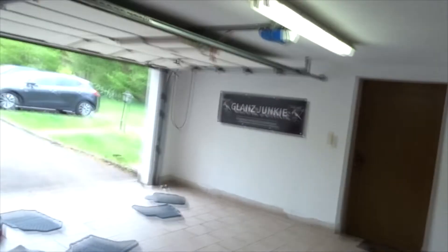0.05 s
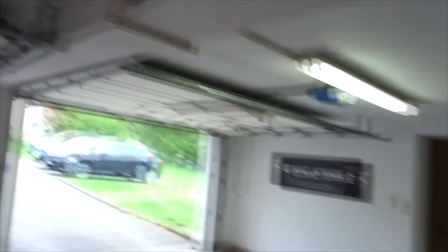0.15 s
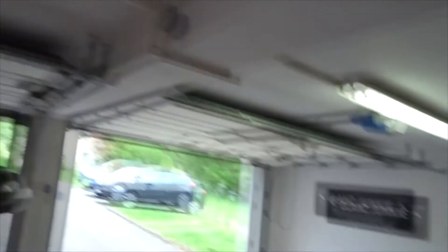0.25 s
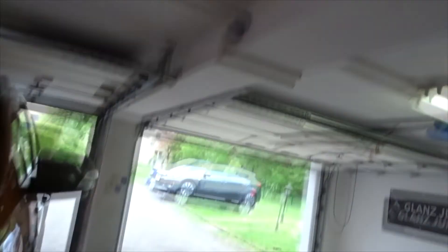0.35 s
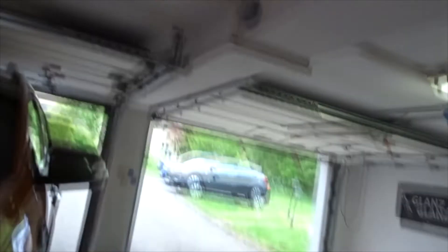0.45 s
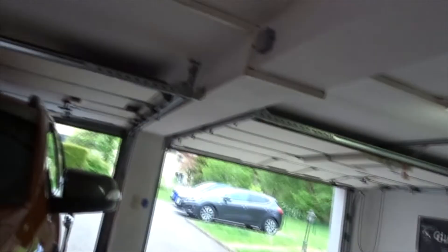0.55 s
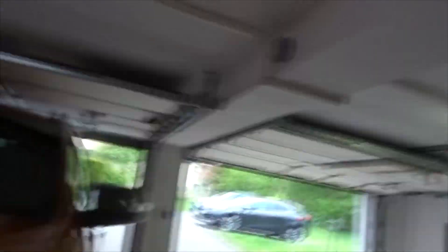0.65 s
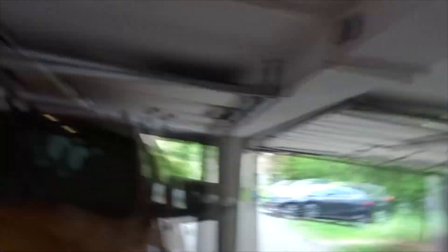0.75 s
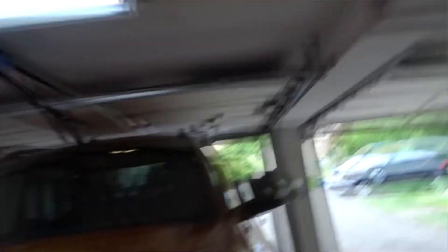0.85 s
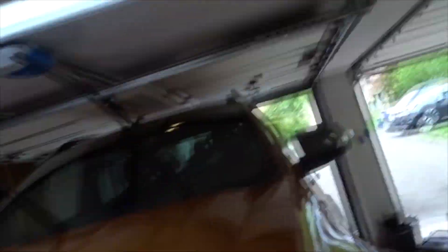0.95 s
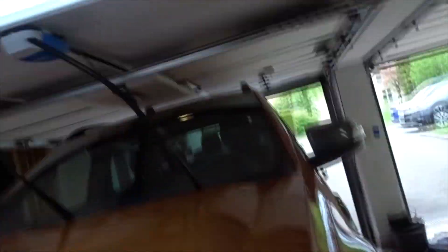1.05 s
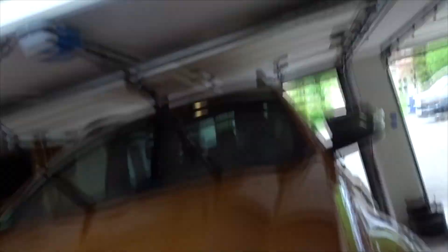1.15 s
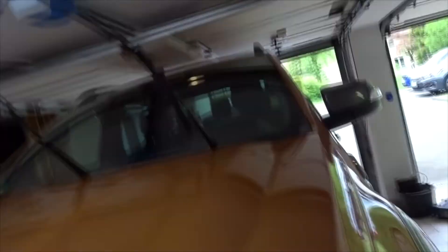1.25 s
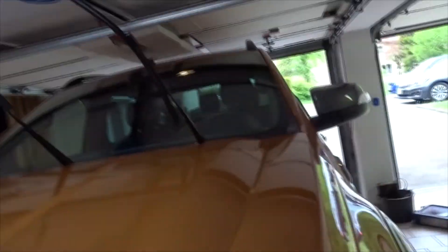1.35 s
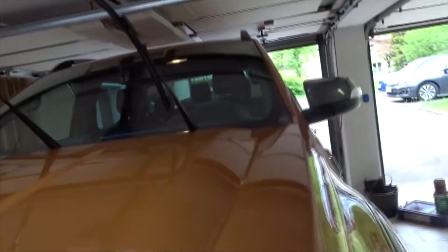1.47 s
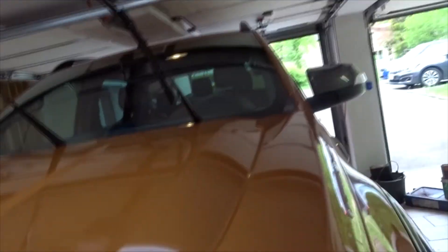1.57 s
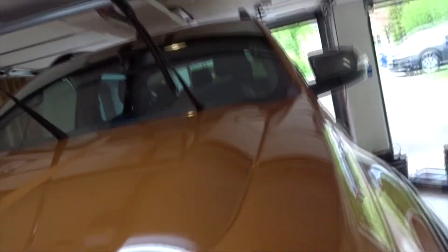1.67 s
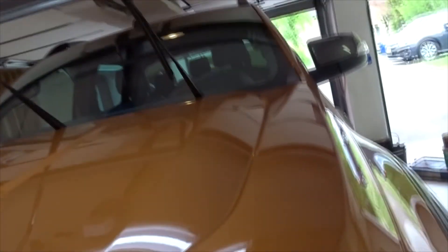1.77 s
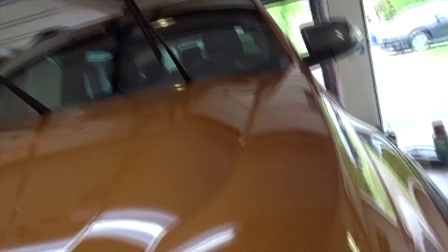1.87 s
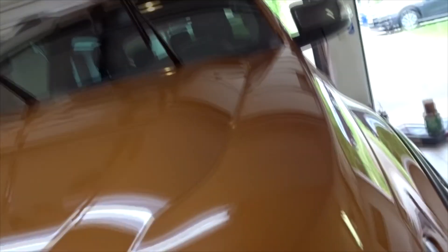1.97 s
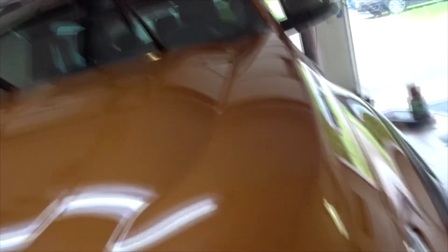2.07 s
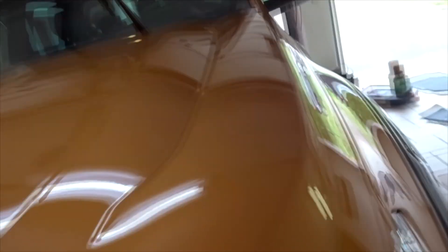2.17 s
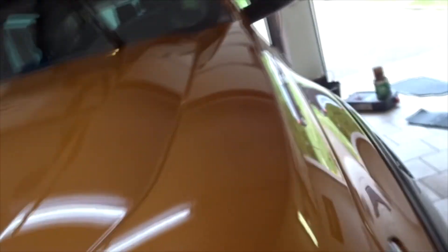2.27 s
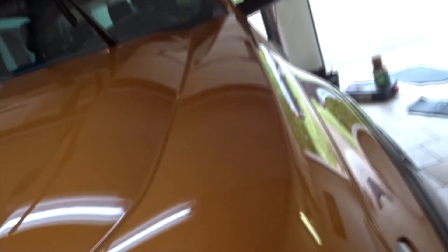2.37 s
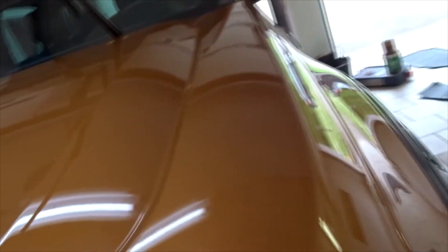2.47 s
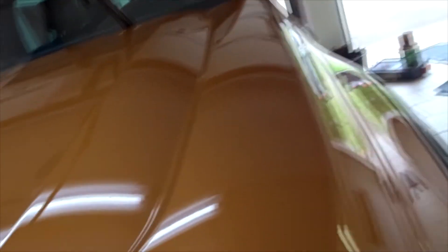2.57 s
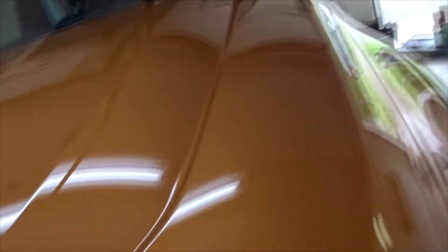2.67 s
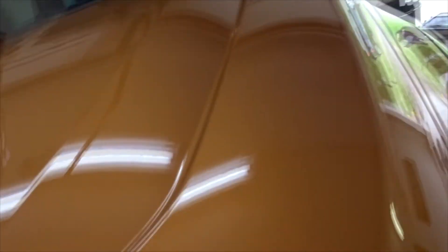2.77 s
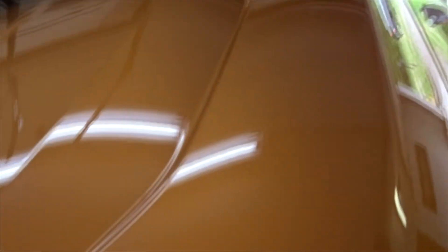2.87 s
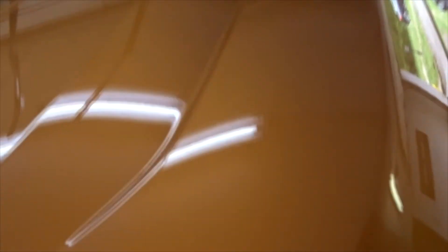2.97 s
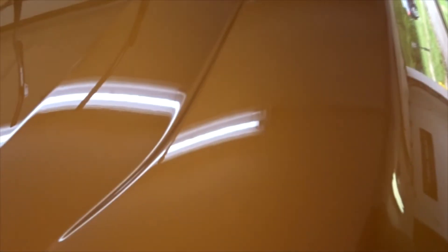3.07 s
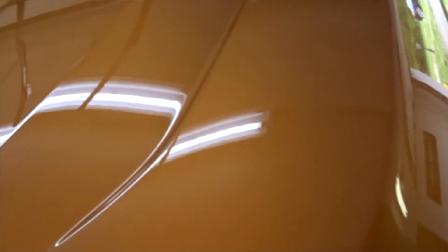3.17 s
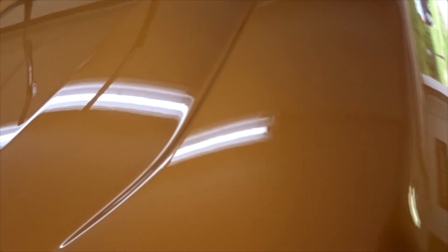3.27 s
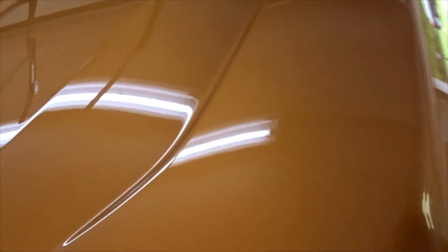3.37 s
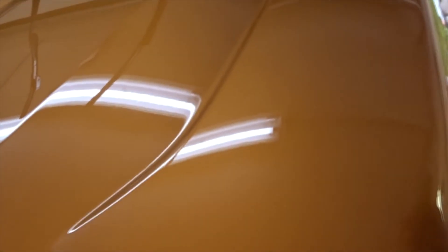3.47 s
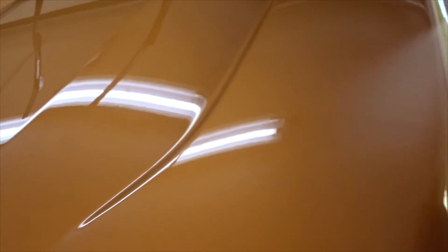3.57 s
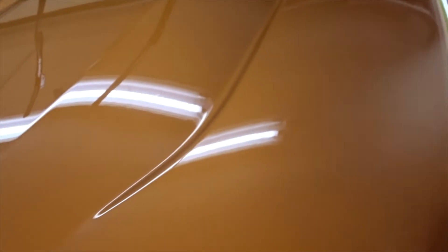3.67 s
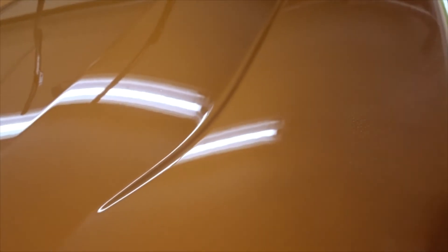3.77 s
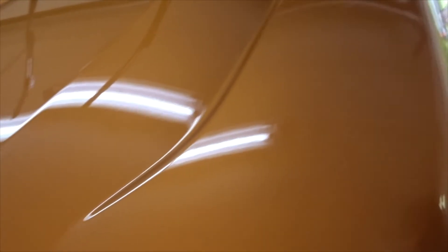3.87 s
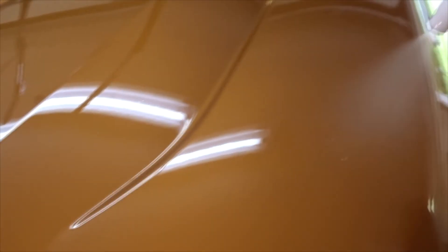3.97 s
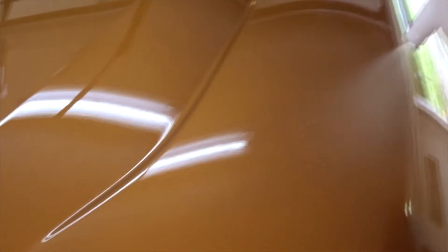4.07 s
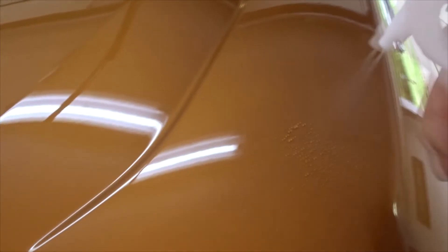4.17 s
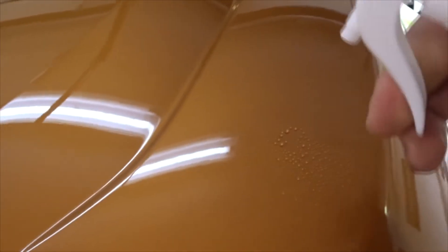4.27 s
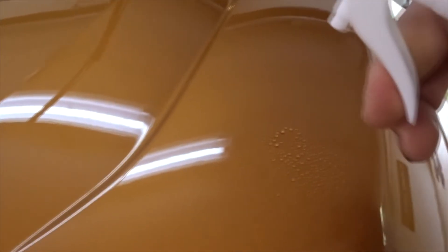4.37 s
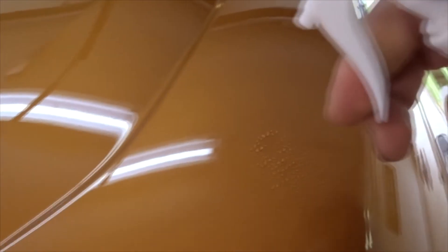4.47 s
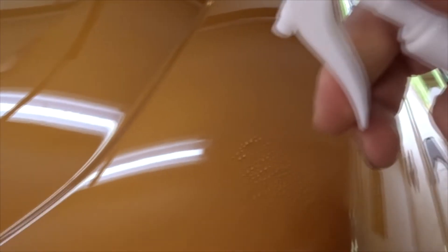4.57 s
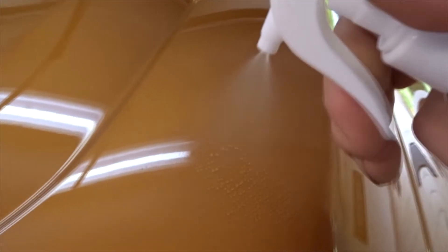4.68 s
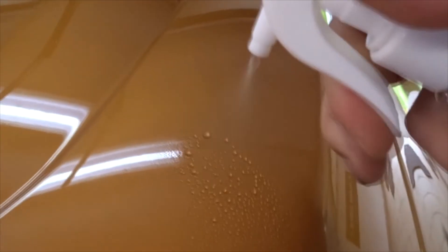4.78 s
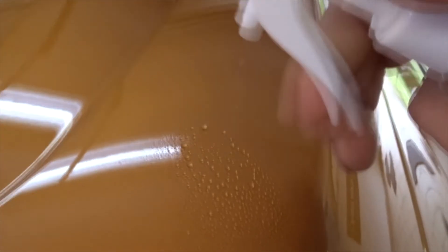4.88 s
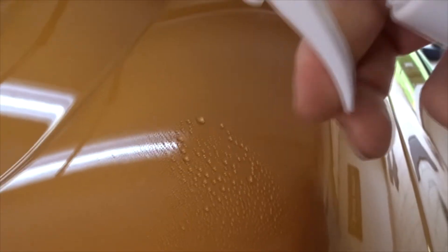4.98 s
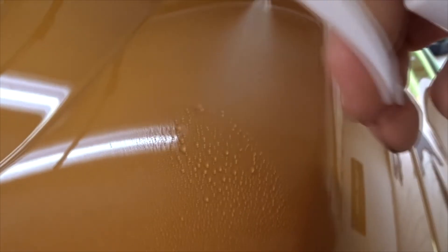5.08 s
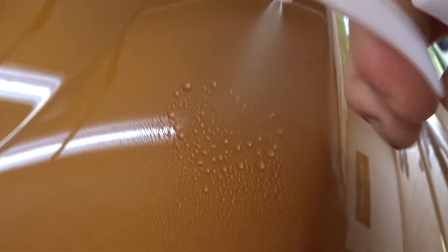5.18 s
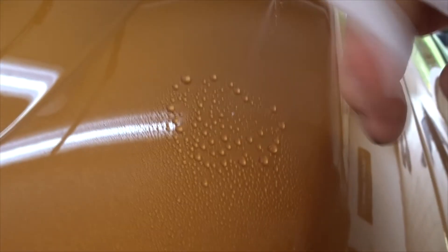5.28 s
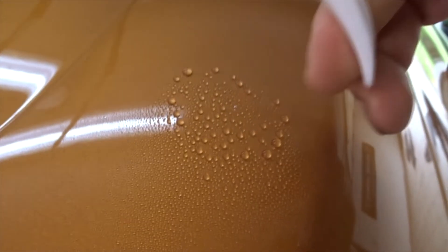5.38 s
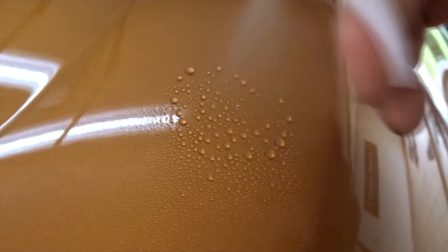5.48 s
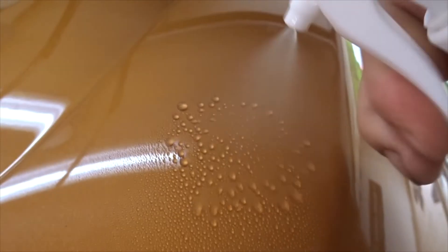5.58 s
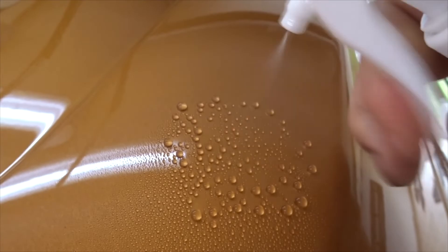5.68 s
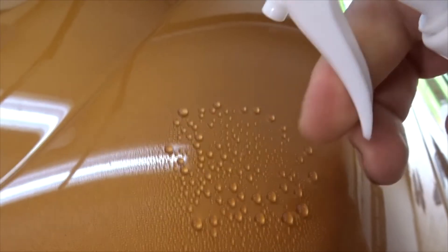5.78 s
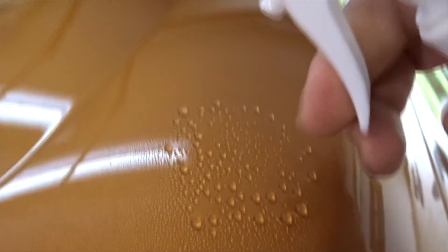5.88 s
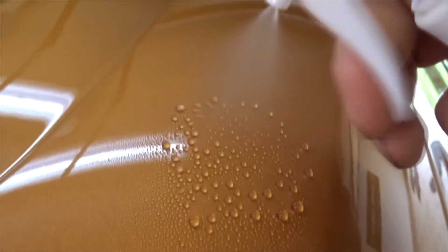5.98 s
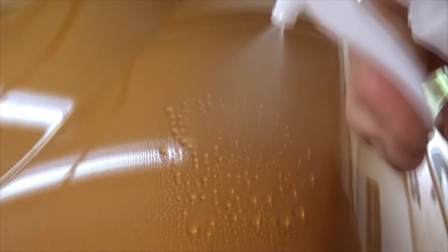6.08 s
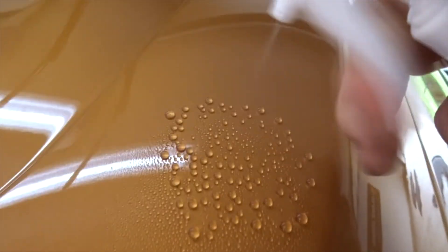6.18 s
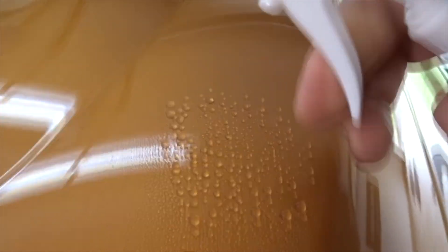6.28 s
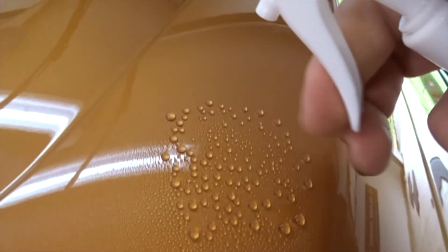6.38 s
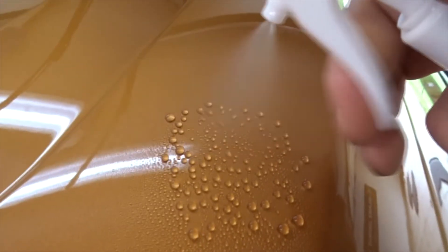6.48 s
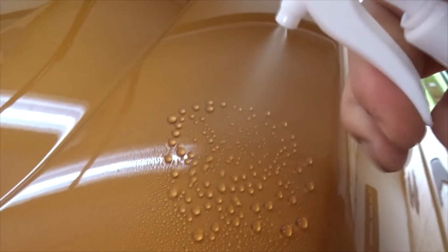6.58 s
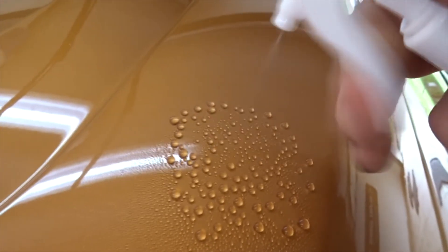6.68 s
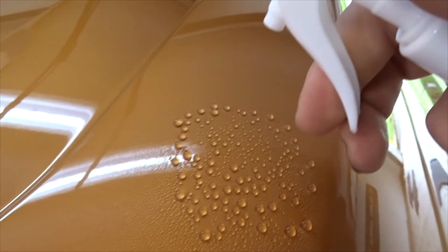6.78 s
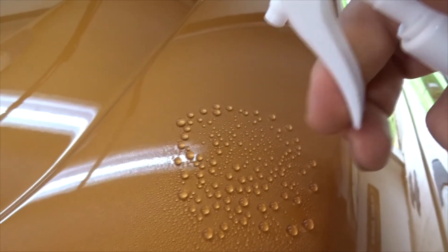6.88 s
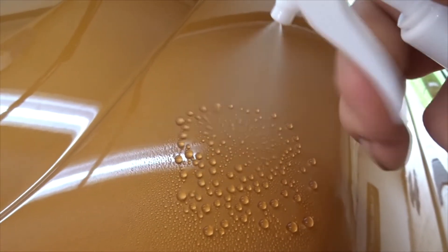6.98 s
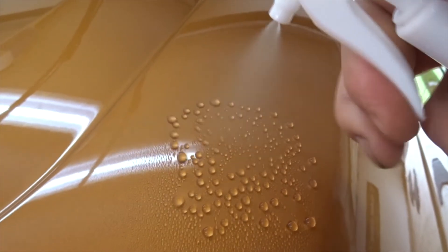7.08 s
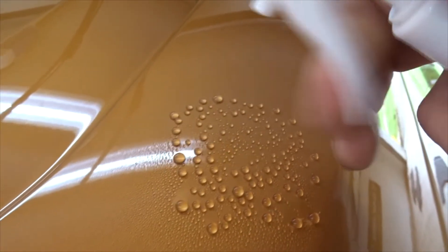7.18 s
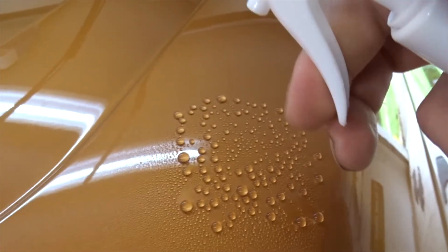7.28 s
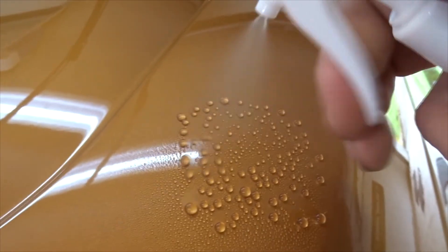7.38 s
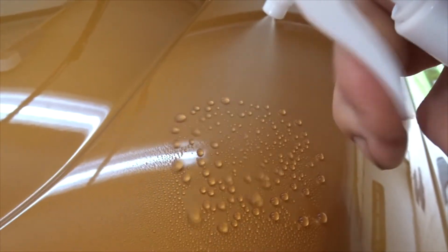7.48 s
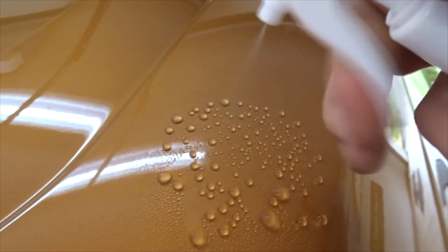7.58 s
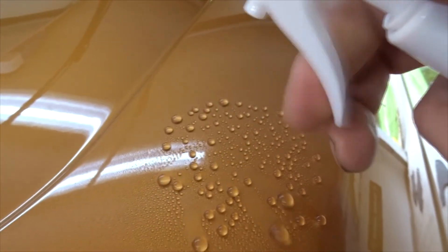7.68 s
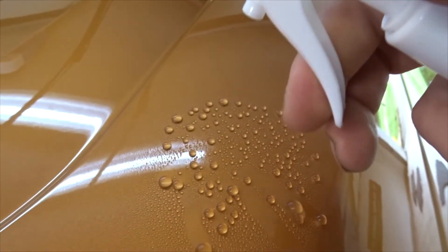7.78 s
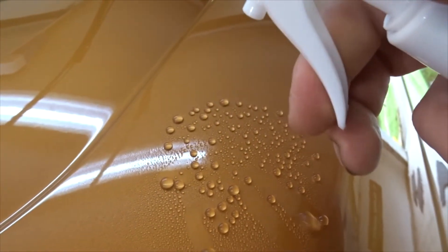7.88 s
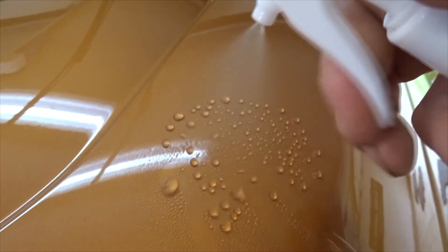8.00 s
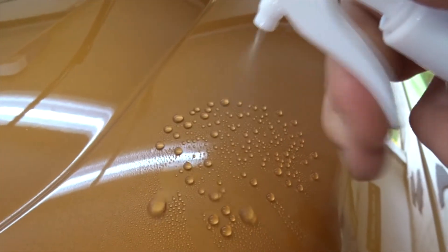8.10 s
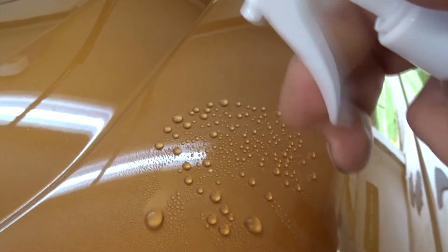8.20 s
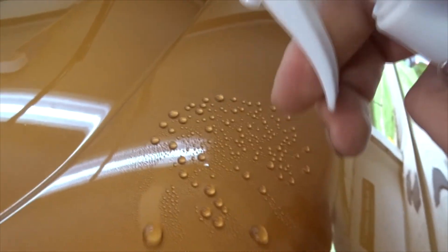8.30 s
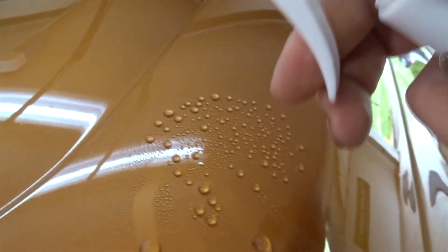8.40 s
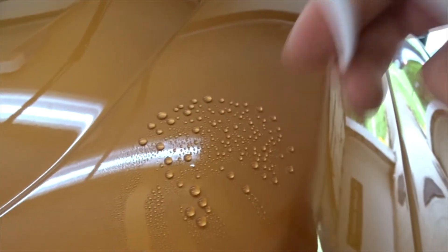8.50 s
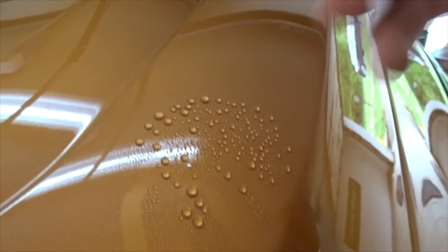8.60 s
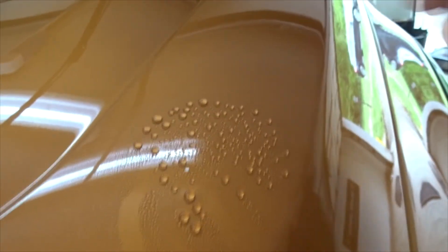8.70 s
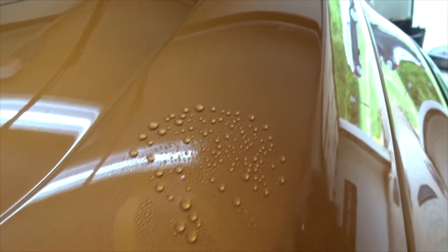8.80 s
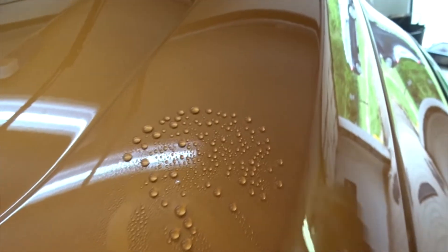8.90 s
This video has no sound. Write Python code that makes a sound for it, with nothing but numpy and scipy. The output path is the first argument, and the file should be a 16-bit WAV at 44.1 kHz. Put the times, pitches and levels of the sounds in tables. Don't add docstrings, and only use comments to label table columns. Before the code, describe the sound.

Songbirds whistle outside an open garage while handheld plastic creaks and clicks, then ten quick trigger-spray strokes hiss close by onto a car bonnet.

```python
import sys
import numpy as np
from scipy import signal
from scipy.fft import rfft, irfft, next_fast_len
from scipy.io import wavfile
from scipy.ndimage import uniform_filter1d, map_coordinates

SR = 44100
rng = np.random.default_rng(int(sys.argv[2]) if len(sys.argv) > 2 else 0)


def generate_wav(sig):
    pcm = np.round(np.clip(np.atleast_2d(sig).T, -1, 1) * 32767).astype(np.int16)
    wavfile.write(sys.argv[1], SR, pcm)


N = 394518


def undb(db):
    return np.exp(np.asarray(db) * np.log(10) / 20)


def unit(x):
    return x / np.sqrt(np.mean(x ** 2))


def octaves():
    return np.fft.rfftfreq(next_fast_len(N), 1 / SR)


def on_log(table, hz):
    f, v = np.transpose(table)
    return np.interp(np.log(hz + 1), np.log(f), v)


def over_time(table):
    return np.interp(np.arange(N) / SR, *np.transpose(table))


def colour(x, table):
    gain = undb(on_log(table, octaves()))
    return irfft(rfft(x, next_fast_len(N)) * gain)[..., :N]


def band(x, lo_hz, hi_hz):
    return signal.lfilter(*signal.butter(2, [lo_hz, min(hi_hz, .45 * SR)], "band", fs=SR), x)


def both_ways(x, hz, kind):
    return signal.sosfiltfilt(signal.butter(2, hz, kind, fs=SR, output="sos"), x)


def walk(rate):
    k = int(SR / rate)
    held = np.repeat(rng.standard_normal(N // k + 1), k)
    return 1.195 * uniform_filter1d(held, k)[:N]


def pair(alike):
    c = np.clip(on_log(alike, octaves()), 0, 1)
    mid, side = rfft(rng.standard_normal((2, next_fast_len(N))))
    shared, own = np.sqrt(1 + c) * mid, np.sqrt(1 - c) * side
    return irfft([shared + own, shared - own])[:, :N]


def place(x, lag, pan_db):
    x = x * np.ones((2, 1))
    if np.isscalar(lag):
        left = np.roll(x[0], round(lag))
    else:
        left = map_coordinates(x[0], [np.arange(N) - lag], order=3)
    return np.array([left * undb(pan_db / 2), x[1] * undb(-pan_db / 2)])


def tail(x, t60, damp_hz):
    t = np.arange(int(t60 * SR)) / SR
    echo = rng.standard_normal((2, len(t))) * undb(-60 * t / t60) * np.clip(t / 0.012, 0, 1)
    echo = band(echo, 170, damp_hz)
    return signal.fftconvolve(x[None], echo / np.sqrt(np.sum(echo[0] ** 2)), axes=1)[:, :N]


def played(tables, fade_s):
    t, rows, gate = np.arange(N) / SR, np.concatenate(tables), np.zeros(N)
    for k in tables:
        start, end = k[0][0], k[-1][0]
        i = slice(max(int((start - fade_s) * SR), 0), int((end + fade_s) * SR))
        gate[i] += np.clip(np.minimum(t[i] - start, end - t[i]) / fade_s + .5, 0, 1)
    return *(np.interp(t, rows[:, 0], c) for c in rows.T[1:]), np.minimum(gate, 1)


def add(out, s, db, hz, t60, width=0.):
    t = np.arange(int(min(.1, 1.5 * t60) * SR)) / SR
    if width:
        noise = rng.standard_normal(SR // 10)[:len(t)]
        ring = unit(band(noise, hz / 2 ** width, hz * 2 ** width)) / 2
    else:
        ring = np.sin(2 * np.pi * hz * t)
    attack = np.minimum(t * SR / 8, 1)
    i = int(s * SR)
    out[i:i + len(t)] += undb(db - 60 * t / t60) * attack * ring


# (time [s], level [dB])
TRAFFIC = [(0, -57), (1.15, -56), (1.67, -60.5), (2.94, -57), (3.6, -58), (4.6, -60.5), (4.9, -57.5),
           (6.3, -56.5), (6.6, -63.5), (7.4, -61.5), (7.8, -60.5), (8.3, -61.5), (8.6, -58.5),
           (8.95, -60.5)]
# (time [s], level [dB])
STIRRING = [(0., -52.5), (.45, -54.5), (.92, -55.5), (1.15, -51.5), (1.67, -59.5), (1.991, -53),
            (2.22, -59), (2.94, -56), (3.54, -58), (4.11, -50.5), (4.409, -65), (4.71, -62), (4.83, -53),
            (5.48, -62), (6.25, -65.5), (7.1, -64), (8.35, -61.5), (8.95, -64.5)]
# (frequency [Hz], level per Hz [dB])
AIR_SPECTRUM = [(40, -43), (190, -29.5), (480, -14.5), (950, -6.5), (1500, -7), (2100, 4), (3500, -11.5),
                (5000, -14), (6000, -16.5), (8300, -31.5), (9700, -27), (12000, -42), (16500, -43)]


def air():
    rumble_db, stir_db = over_time(TRAFFIC), over_time(STIRRING)
    levels = [rumble_db, stir_db + 1, stir_db - 2, stir_db - 10.5]
    wash = colour(pair([(100, 0.36), (300, 1.0), (2000, 0.46), (12000, 0.079)]), AIR_SPECTRUM)
    heard_hz = [(300, 1300), (1500, 3000), (3500, 7500), (8500, 15000)]
    levels = [db - 20 * np.log10(np.std(band(wash[0, :SR], *hz))) for db, hz in zip(levels, heard_hz)]
    centres_hz = [150, 400, 900, 1700, 2500, 3600, 4800, 6200, 7800, 9800, 12500]
    steered_by = [0, 0, 0, 1, 1, 2, 2, 2, 3, 3, 3]
    spectrum, log_hz = rfft(wash, next_fast_len(N)), np.log(octaves() + 1)
    bass_swing_db = 2.04 * (rumble_db - rumble_db.mean())
    out = 0
    for k, who in enumerate(steered_by):
        share = np.interp(log_hz, np.log(centres_hz), np.arange(len(centres_hz)) == k)
        flicker_db = 1.8 * walk(3) + walk(13)
        level_db = levels[who] + (k < 2) * bass_swing_db + flicker_db
        out = out + irfft(spectrum * share)[:, :N] * undb(level_db)
    hiss_spectrum = [(20, 4), (150, -4.0), (1000, -0.5), (14000, -1.5), (16500, -9)]
    hiss = colour(pair([(100, 0.32), (15000, 0.23)]), hiss_spectrum)
    return place(out * undb(-1.0), 1.7, -1.0) + undb(-71.5) * unit(hiss)


def glides(rows, entry_db=6.5, swell=0.32, exit_db=1.5):
    return [[(s, a, db + entry_db), (s + swell * long, a + swell * (b - a), db), (s + long, b, db + exit_db)]
            for s, long, a, b, db in rows]


def whistle(tables, warble_hz, depth, waver_db, fade_s=0.014, rasp=0., crest_s=None):
    hz, db, gate = played(tables, fade_s)
    if crest_s is None:
        warble = np.sin(2 * np.pi * np.cumsum(warble_hz * (1 + 0.2026 * walk(30))) / SR)
    else:
        warble = np.cos(2 * np.pi * warble_hz * (np.arange(N) / SR - crest_s))
    phase = 2 * np.pi * np.cumsum(hz * (1 + depth * warble + rasp * walk(350))) / SR
    tone = np.sin(phase, out=np.zeros(N), where=gate > 0)
    return np.sqrt(2) * tone * undb(db + waver_db * walk(70)) * gate


HELD_NOTES = [(0., .03, 2230, 2220, -50), (.048, .04, 2230, 2200, -55), (.1, .045, 2200, 2190, -58),
              (.18, 0.0348, 2553, 2560, -45.5), (.32, 0.036, 2350, 2387, -41.5),
              (.355, 0.063, 2340, 1898, -39.5), (.425, 0.039, 1890, 1840, -40),
              (.835, 0.094, 2395, 2337, -58), (.935, 0.071, 2384, 2370, -57),
              (2.036, 0.026, 2887, 3096, -45), (2.555, 0.064, 1938, 2020, -51.5),
              (3.86, 0.086, 2353, 2333, -46.5), (4.17, 0.1, 2140, 2070, -50.5),
              (4.34, 0.045, 2150, 2600, -54), (4.39, 0.067, 2574, 2510, -56)]
DYING_NOTES = [
    (1.345, 0.16, 1988, 2022, -39),
    (2.095, 0.17, 2725, 2640, -51),
    (4.24, 0.13, 2034, 1976, -42),
]
# (time [s], pitch [Hz], level [dB])
SLURS = [
    [(1.205, 2430, -49), (1.225, 2428, -31.5), (1.262, 2420, -31), (1.276, 2392, -55), (1.287, 2380, -25.5),
     (1.298, 2226, -34.5), (1.312, 1768, -46), (1.328, 1956, -39), (1.343, 1972, -36)],
    [(1.52, 2430, -48), (1.545, 2393, -44), (1.58, 2380, -34.5), (1.6, 2344, -39), (1.632, 2355, -34.5),
     (1.682, 2132, -40), (1.71, 2034, -47), (1.75, 1967, -41)],
    [(1.754, 2030, -45), (1.772, 2314, -35), (1.79, 2585, -34.5), (1.834, 2744, -40), (1.862, 2790, -42.5),
     (1.88, 2790, -56)],
    [(3.015, 2237, -53), (3.06, 2304, -42), (3.085, 2240, -52), (3.12, 2060, -44.5), (3.19, 2038, -44.5),
     (3.21, 2005, -52), (3.28, 2000, -57)],
]
BUZZ_NOTES = [
    (.205, 0.074, 1785, 1865, -45.5),
    (.571, 0.095, 2000, 2004, -39.5),
    (.66, 0.123, 1999, 1967, -38),
]
# (time [s], share of pitch [0-1])
BUZZ_SWING = [(.225, 0.021), (.24, 0.065), (.57, 0.063), (.66, 0.069), (.73, 0.033), (.77, 0.0096)]
FLOURISH = [(2.027, .009, 3800, 4150, -44), (2.06, .007, 4550, 4050, -44), (2.082, .01, 3450, 3700, -45),
            (2.093, .005, 4100, 4700, -45), (2.099, .004, 5100, 5300, -50), (2.769, .007, 3000, 2500, -53),
            (2.779, .009, 1700, 2250, -52), (2.795, .009, 1700, 2450, -55), (2.812, .012, 1900, 2900, -54),
            (2.828, .009, 2000, 2850, -55), (2.843, .014, 2300, 3300, -54)]
FAR_NOTES = [(.03, 0.095, 5000, 5000, -55.5), (.155, 0.13, 4996, 4970, -59), (.922, 0.035, 2710, 2610, -54),
             (1.01, 0.072, 1490, 1530, -54), (1.08, .14, 1523, 1660, -58), (1.7, 0.04, 1520, 1498, -64),
             (1.9, 0.075, 2070, 2040, -56.5), (2.02, 0.073, 1900, 1770, -57), (2.1, .1, 1780, 1760, -68),
             (2.48, 0.045, 1856, 1925, -57), (2.75, 0.093, 1620, 1680, -60.5),
             (3.295, 0.056, 2020, 1840, -50.5), (3.35, 0.088, 1860, 1740, -61),
             (3.955, 0.043, 3300, 3300, -61), (4.58, 0.11, 3360, 3280, -71),
             (7.78, 0.19, 2027, 1954, -66.5)]
FAR_BUZZES = [(.58, 0.19, 7610, 7340, -69), (1.09, 0.12, 3530, 3320, -51.5), (1.19, 0.082, 3310, 3290, -65),
              (1.575, .04, 4770, 4600, -70), (1.62, 0.12, 6740, 6980, -66.5),
              (1.88, 0.077, 5880, 6000, -69), (2.858, 0.03, 3310, 3490, -56), (2.9, .06, 3600, 3500, -65)]
CHATTER = [(0., .045, 3250, 3250, -60), (.76, .035, 3750, 3700, -66), (.8, .08, 2950, 3250, -62),
           (.935, .07, 3950, 4150, -68), (1.1, .06, 2230, 2180, -57), (1.165, .11, 2150, 2050, -54),
           (2.2, .44, 7650, 7450, -68.5), (2.68, .14, 1330, 1290, -70), (2.86, .14, 1300, 1340, -70),
           (3.335, .08, 3400, 3450, -62), (3.44, .1, 2600, 2700, -68)]
ROUGH_CHATTER = [(1.1, .2, 5700, 6000, -71), (1.32, .22, 6100, 6400, -72), (2.08, .07, 6900, 7200, -70),
                 (2.5, .14, 3350, 3300, -70), (2.65, .08, 2000, 2030, -68), (2.75, .08, 2100, 2600, -60),
                 (2.85, .04, 2250, 2250, -62), (2.9, .15, 6100, 6100, -71), (3.12, .08, 1750, 1800, -65)]
# (time [s], left over right [dB])
SINGER_SIDE = [(0.3, -3), (1.4, -5), (1.6, -8.5), (1.9, -7), (2.1, -3), (3.1, -5.5), (4.4, -4.5)]


def birds():
    song = sorted(glides(HELD_NOTES) + glides(DYING_NOTES, 0, 0.029, -34) + SLURS)
    near = whistle(song, 45, 0.0047, 1.03, fade_s=0.019)
    crests_s = (.2425, .5745)
    crest_s = np.where(np.arange(N) / SR < np.mean(crests_s), *crests_s)
    buzz = whistle(glides(BUZZ_NOTES, 0.91), 43.7, over_time(BUZZ_SWING), 1.7,
                   fade_s=.004, rasp=0.014, crest_s=crest_s)
    chirps = whistle(glides(FLOURISH, 0), 70, 0.01, 2, fade_s=0.003, rasp=.01) * undb(3)
    far = whistle(glides(FAR_NOTES), 50, 0.016, 3.5)
    far += whistle(glides(FAR_BUZZES), 76, .022, 4)
    far += whistle(glides(CHATTER), 85, .02, 6, rasp=.04)
    far += whistle(glides(ROUGH_CHATTER), 110, .03, 6, rasp=.06)
    echoes = tail(near + 0.47 * chirps + 0.72 * buzz + 1.13 * far, t60=.5, damp_hz=16400)
    pan_db = over_time(SINGER_SIDE)
    direct = place(near + chirps + far, 3, pan_db) + place(buzz, 3, -1)
    return direct + undb(-3.5) * place(echoes, 0, pan_db / 2)


# (time [s], peak level [dB], ring [Hz], treble [dB])
BODY_CREAKS = [(0.0989, -32, 2840, -19), (0.1226, -29, 2620, -12), (0.148, -36, 2200, -52),
               (0.2876, -20, 3280, -21), (0.75, -33.5, 2600, -28), (1.427, -37, 3775, -15),
               (1.7412, -31.5, 2867, -17), (2.201, -51.5, 2690, 6), (2.429, -34.5, 3500, -16),
               (2.638, -33, 2667, -22), (3.006, -37.5, 2970, -27), (3.033, -41, 3530, -19),
               (3.119, -42, 3030, -28), (3.188, -33.5, 4220, -48), (3.3256, -39, 3390, -24),
               (3.472, -33, 2900, -42)]
# (time [s], peak level [dB], ring [Hz], knock [dB])
SHELL_KNOCKS = [(0.35, -39.5, 2570, -1), (0.4401, -39.5, 2770, -8.5), (0.572, -35, 3050, -12),
                (0.655, -35.5, 2570, -4.5), (0.7066, -35, 2600, -5), (1.0601, -27, 5230, -11.5),
                (1.0677, -29, 4400, -3), (1.102, -47.5, 3460, 6.5), (1.1429, -44.5, 3430, 0.5),
                (1.9914, -45.5, 3310, -5.5), (2.485, -43, 2540, -7)]
STRAP_CRACKLES = [.018, .04, .062, .115, .638, .668, 1.018, 1.31, 1.865, 1.886, 2.02, 2.362, 2.69, 2.82]
# (time [s], peak level [dB], pitch [Hz])
NAIL_SCRATCHES = [(.152, -31, 2300), (.157, -36, 2600), (.166, -29, 2090), (.171, -38, 2300),
                  (.186, -41, 2000), (2.692, -42, 1500), (2.705, -37, 2100), (2.72, -43, 2200),
                  (2.5535, -44, 6040), (1.953, -45, 5980), (1.977, -46, 6780)]
# (time [s], level [dB], pitch [Hz])
PALM_THUMPS = [
    (0.351, -52, 200),
    (0.754, -43.5, 130.6),
    (1.067, -40, 149),
    (5.577, -53, 200),
]
# (time [s], peak level [dB], pitch [Hz], ring T60 [s])
SHELL_PINGS = [(0.1, -47, 2800, .02), (.1005, -41, 4330, .02), (.115, -35, 2540, 0.019),
               (0.2879, -12, 4220, 0.0041), (0.2883, -21, 2290, 0.02), (0.2877, -32.5, 1265, 0.044),
               (.2915, -20, 7500, .005), (.295, -26, 4300, 0.0087), (.2963, -26, 2520, .01),
               (0.75, -41, 2600, .03), (1.018, -46, 3260, .015), (1.037, -41, 3000, .015),
               (1.0508, -34, 4500, .006), (1.052, -33, 1460, .012), (1.0647, -17.5, 2370, 0.0044),
               (1.0645, -23, 10400, .006), (1.068, -25, 860, 0.0084), (3.863, -33, 3490, 0.011),
               (1.7864, -41.5, 4170, 0.031), (2.357, -47, 2097, 0.027), (2.414, -42.5, 3970, .03),
               (2.638, -42, 2690, 0.025), (3.3264, -34, 3510, 0.029), (3.472, -32.5, 2340, 0.022),
               (3.502, -54, 2600, .015), (3.535, -50, 2370, 0.013)]
# (peak time [s], rise [s], fall [s], level [dB])
GRIP_RUBS = [
    (0.302, 0.0033, 0.11, -49.5),
    (.45, 0.048, 0.053, -49.5),
    (0.697, 0.046, 0.024, -43.5),
    (1.416, 0.027, 0.026, -51),
    (2., 0.027, 0.014, -47.5),
    (2.186, 0.2, 0.0068, -57.5),
]


def handling():
    out, low = np.zeros((2, N))
    snaps = [(s, db, hz, -30.5, treble_db) for s, db, hz, treble_db in BODY_CREAKS]
    knocks = [(*row, -20.5) for row in SHELL_KNOCKS]
    for s, db, hz, knock_db, treble_db in snaps + knocks:
        add(out, s, db - 1.5, hz, .02, width=0.8)
        add(out, s, db, hz, .025, width=0.2)
        add(out, s, db + 0.5, 4500, .005, width=0.79)
        add(low, s, db + knock_db + 9.5, 700, .04, width=1.0)
        add(out, s, db + treble_db + 14.5, 11000, .016, width=0.3)
    for s in STRAP_CRACKLES:
        add(out, s, -39, 11500, .012, width=0.55)
    for s, db, hz in NAIL_SCRATCHES:
        add(out, s, db, hz, .014, width=.75)
    for s, db, hz in PALM_THUMPS:
        add(low, s, db, hz, .09, width=2.5)
    for s, db, hz, t60 in SHELL_PINGS:
        add(out, s, db, hz, t60)
        add(out, s, db - 10, hz, .012, width=1.0)
    edge_db = -12.5
    rubs = [[(s - rise, db + edge_db), (s, db), (s + fall, db + edge_db)] for s, rise, fall, db in GRIP_RUBS]
    rub_db, gate = played(rubs, 0.013)
    rub_spectrum = [(200, -31.0), (800, 16.5), (2500, 17.5), (6000, 12.0), (16000, -2.0)]
    rub = colour(pair([(500, 0.24), (15000, 0.21)]), rub_spectrum)
    rub = rub / np.std(band(rub[0], 4300, 15000)) * undb(rub_db + 3.2 * walk(250)) * gate
    return place(out, 2.28, -7.5) + place(low, 1, 3) + rub


# (time [s], peak level [dB], pitch [Hz])
HEAD_POPS = [(3.654, -37.5, 1130), (3.799, -47, 1072), (3.863, -42.5, 820), (4.263, -43, 695),
             (4.936, -41, 1120), (5.302, -42, 646), (5.348, -43, 616), (5.3745, -41.5, 800),
             (5.45, -42.5, 700), (5.575, -35, 980), (5.796, -45.5, 774), (5.817, -51.5, 800),
             (6.243, -37.5, 1010), (6.307, -52, 791), (6.3925, -45.5, 940), (6.408, -51, 700),
             (6.427, -46, 850), (6.771, -45.5, 790), (8.257, -47.5, 820)]
# (time [s], peak level [dB])
REBOUNDS = [
    (3.874, -34.5),
    (4.274, -36),
]
# (time [s], peak level [dB])
FINGER_TICKS = [(2.4285, -46), (3.564, -38.5), (3.6558, -32), (3.8024, -38), (3.829, -41.5), (3.935, -48),
                (4.9533, -46), (5.03, -46), (5.3594, -53), (5.7942, -46.5), (5.95, -52.5), (6.438, -49.5),
                (6.9077, -52), (7.3595, -52), (7.6982, -41.5), (7.871, -48)]
# (frequency [Hz], level [dB])
HEAD_RINGS = [(6200, -8), (7050, -4), (10600, -2.5)]


def trigger():
    out = np.zeros(N)
    valve_pops = [(opens + 0.00104, full_db - 15.5, 790) for opens, *_, full_db in PULLS]
    for s, db, hz in HEAD_POPS + valve_pops:
        add(out, s, db, hz, .03)
        add(out, s, db + 2.0, 1100, .025, width=0.87)
    end_stops = [(row[3] + 0.0028, -26) for row in PULLS]
    for s, db in REBOUNDS + end_stops:
        add(out, s, db + 1.0, 7000, .02, width=2.3)
        add(out, s + 0.00198, db - 14.5, 2350, .03)
        for hz, mode_db in HEAD_RINGS:
            add(out, s, db + mode_db - 3, hz, .016)
    for s, db in FINGER_TICKS:
        add(out, s, db + 8.0, 2280, .02)
        add(out, s, db + 0.5, 3000, .015, width=0.89)
    return band(out, 580, 15800)


def stroke(opens, forms_s, falls_s, shuts, full_db, tilt_db):
    formed, eases = opens + forms_s, shuts - falls_s
    slack = eases + 0.41 * falls_s
    times = np.array([opens, formed, formed + 0.026, (formed + eases) / 2, eases - .025,
                      eases, slack, (slack + shuts) / 2, shuts - .012, shuts])
    below_db = np.array([-20.5, -4.5, -1.0, 0.5, 0.5, -1.0, -11.0, -22.5, -30, -49])
    forming_db = below_db * (times <= formed)
    arch = np.array([0.46, -1.2, 0.051, 0.87, 0.64, -1.1, -1.3, 0, -0.74, 0])
    return np.transpose([times, full_db + below_db, below_db, forming_db, tilt_db * arch])


# (time [s], how far aside [0-1])
NOZZLE_PATH = [(3.599, 1.0), (4.1, 0.74), (4.8, 0.2), (5.6, 0.13), (8.1, 0.16)]


def aside():
    return over_time(NOZZLE_PATH)


# (valve opens [s], jet forms in [s], pressure falls for [s], valve shuts [s], full hiss [dB])
PULLS = [
    (3.562, .022, .06, 3.81, -28.8),
    (3.984, .032, .058, 4.213, -28.3),
    (4.6605, .05, .073, 4.89, -26.9),
    (5.093, .036, .078, 5.32, -25.6),
    (5.5095, .027, .071, 5.738, -24.7),
    (5.998, .04, .08, 6.242, -24.8),
    (6.491, .03, .073, 6.72, -26.5),
    (6.974, .044, .079, 7.213, -25.7),
    (7.415, .041, .086, 7.652, -25.0),
    (7.986, .016, .084, 8.198, -27.5),
]
PULL_TILT_DB = [4.4, 0.57, 4.3, 2.9, 4, 3.6, 2.7, 2.8, 1.2, 2]
PULL_SWIRL_DB = [2, 2, -0.3, 0.9, -1, -0.5, 0.7, -0.7, 1.5, 2]
# (frequency [Hz], level per Hz [dB])
MIST_SPECTRUM = [(180, -55), (500, -36), (1000, -18), (3200, -4.5), (5000, 0), (9490, -3), (15400, -5.5),
                 (16500, -40)]
# (frequency [Hz], likeness [0-1])
MIST_LIKENESS = [(1000, 1), (4000, 0.91), (8000, 0.8), (15000, 0.72)]
# (frequency [Hz], width [Hz], level over the hiss [dB])
SWIRL_RINGS = [(4814, 950, -14), (6840, 1300, -14.5)]


def mist():
    pulls = [stroke(*row, tilt) for row, tilt in zip(PULLS, PULL_TILT_DB)]
    hiss_db, below_db, forming_db, tilt_db, gate = played(pulls, 0.0022)
    size_db = 5.4 * np.minimum(rng.exponential(size=N), 3)
    drops = (rng.random(N) < 3000 / SR) * undb(size_db) * rng.choice([-1, 1], N)
    jet = colour(unit(pair(MIST_LIKENESS)) + 0.22 * unit(drops), MIST_SPECTRUM)
    jet = jet + sum(undb(db) * band(jet, hz - wide / 2, hz + wide / 2) for hz, wide, db in SWIRL_RINGS)
    jet = jet / np.std(band(jet[0], 4440, 13500))

    lows, tops = both_ways(jet, 3700, "low"), both_ways(jet, 9000, "high")
    low_db = -3 + 3.5 * aside() - 0.5 * below_db + 1.3 * walk(60)
    top_db = -4 + 4.5 * aside() + 0.31 * forming_db - 0.41 * below_db + 0.59 * walk(150)
    tone = (jet - lows - tops) * undb(0.71 * walk(90))
    tone += tops * undb([[3], [0]]) * undb(top_db)
    tone += lows * undb(low_db)
    dull = both_ways(tone, 5600, "low")
    tone = dull * undb(-tilt_db / 2) + (tone - dull) * undb(tilt_db / 2)

    tone += undb(-5.5) * band(tone, 2210 - 480, 2210 + 480)
    t = np.arange(N) / SR
    *_, shuts, full_db = np.transpose(PULLS)
    swirl_hz = 4300
    swirl = undb(np.interp(t, shuts - .1, PULL_SWIRL_DB)) - 1
    tone += band(tone, 0.75 * swirl_hz, 1.15 * swirl_hz) * swirl

    last = np.searchsorted(shuts, t) - 1
    refill_t60_s, inlet_hz = 0.55, 6240
    sip_db = full_db[last] - 37 - 60 * np.abs(t - shuts[last]) / refill_t60_s
    sip = (last >= 0) * undb(sip_db + 1.9 * walk(120))
    water = jet + 8.9 * lows + undb(-0.5) * band(jet, .9 * inlet_hz, 0.98 * inlet_hz)
    return tone * undb(hiss_db + 0.75) * gate + water * sip


def scene():
    i = np.arange(N)
    lag, pan_db, mirror = .28 + 1.15 * aside(), -1.04 - 4 * aside(), 0.045 + 0.022 * aside()
    outside = air() + birds()
    hand = handling()
    bottle = trigger() + mist()
    detour_ms = 0.522
    bottle = bottle + mirror * np.array([np.interp(i - detour_ms * SR / 1000, i, ear) for ear in bottle])
    room = undb(-17.5) * tail(undb(-1.5) * bottle[0] + hand[0], t60=.45, damp_hz=10000)
    return outside + hand + room + place(bottle, lag, pan_db)


def roll_off(x):
    return signal.sosfilt(signal.butter(12, 16970, fs=SR, output="sos"), x)


def record(dry):
    thin = signal.sosfilt(signal.butter(1, 120, "high", fs=SR, output="sos"), dry)
    return roll_off(thin)


dry = scene()
out = record(dry)
generate_wav(out)
```